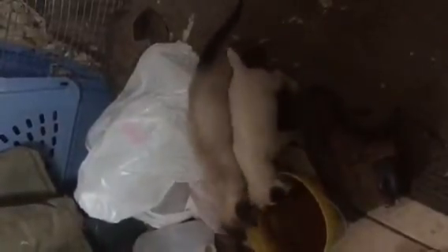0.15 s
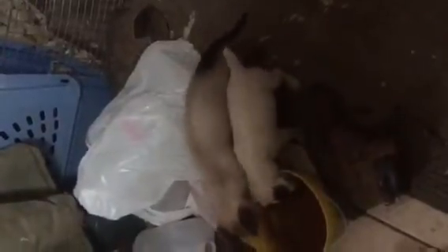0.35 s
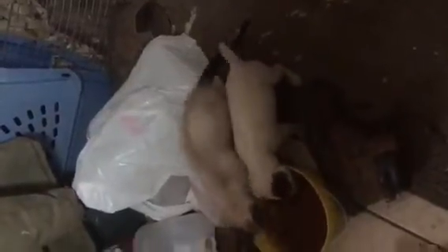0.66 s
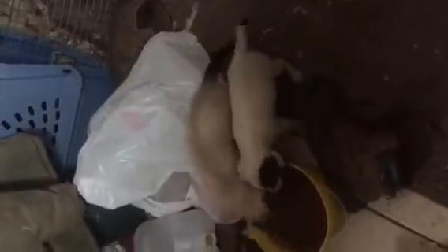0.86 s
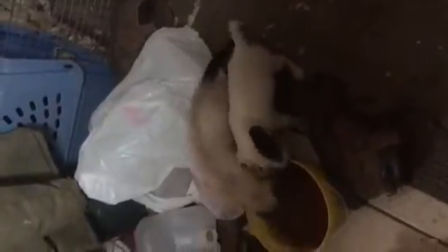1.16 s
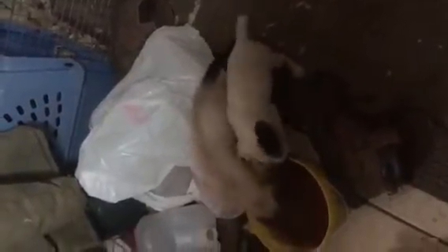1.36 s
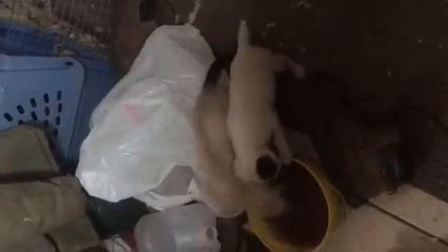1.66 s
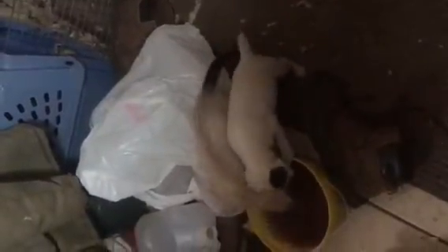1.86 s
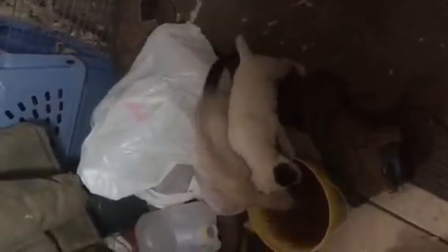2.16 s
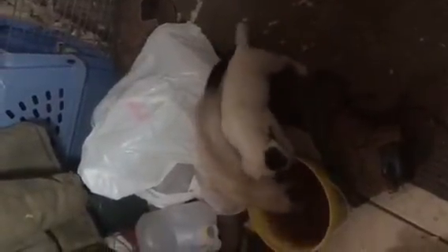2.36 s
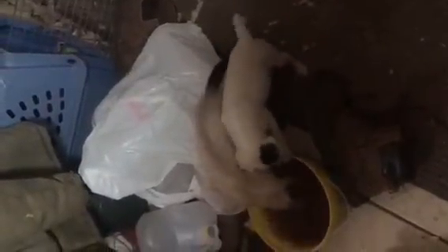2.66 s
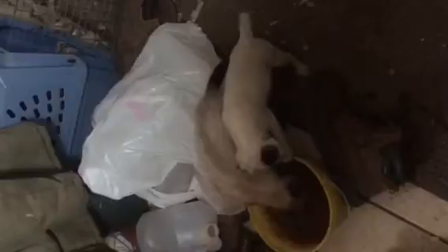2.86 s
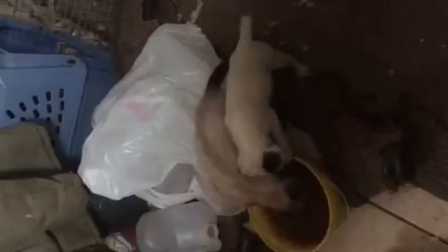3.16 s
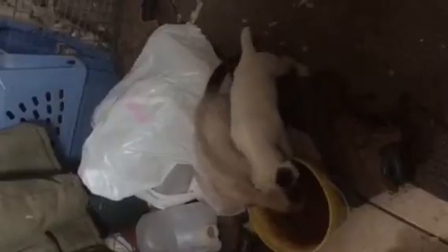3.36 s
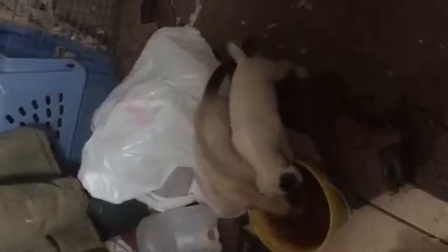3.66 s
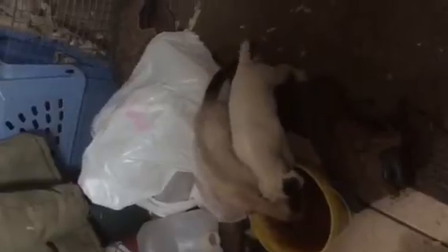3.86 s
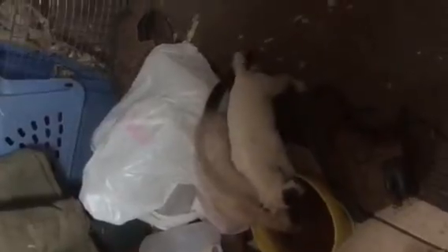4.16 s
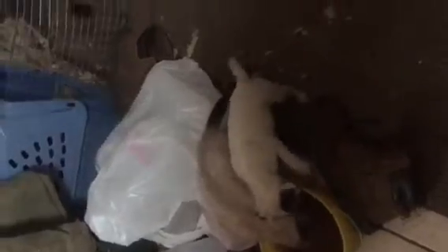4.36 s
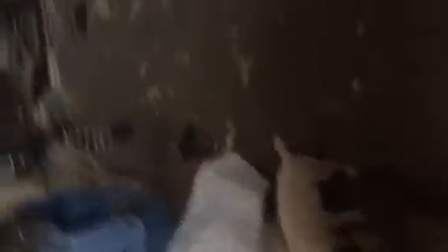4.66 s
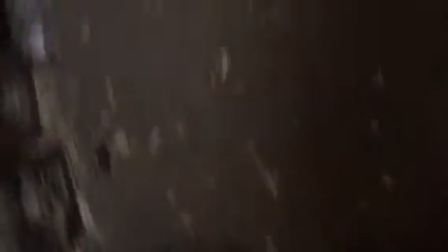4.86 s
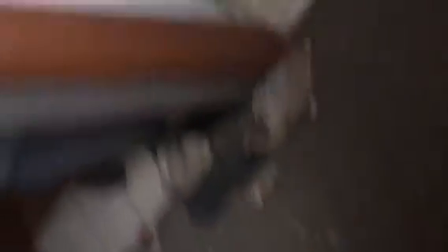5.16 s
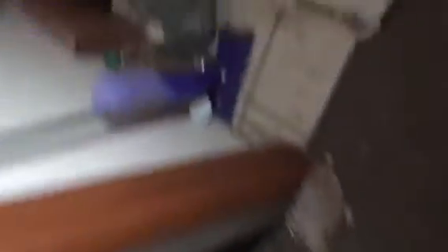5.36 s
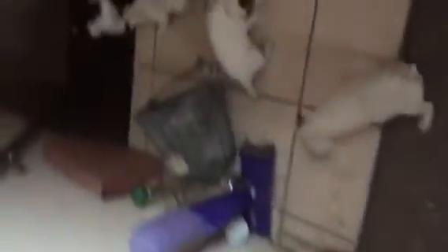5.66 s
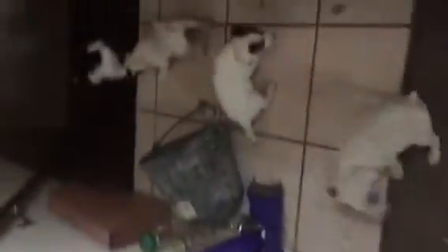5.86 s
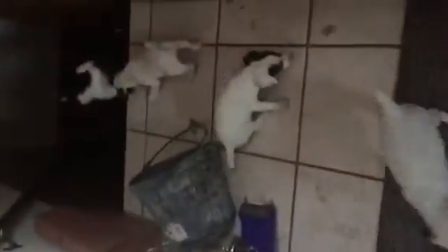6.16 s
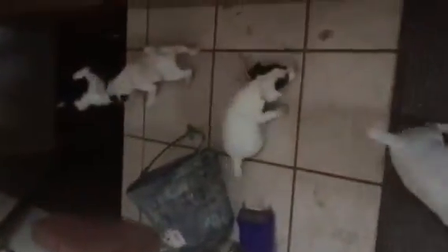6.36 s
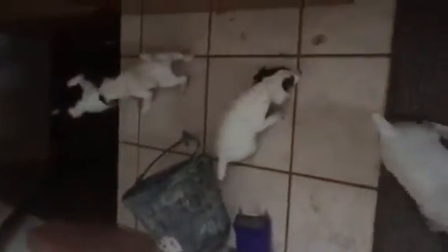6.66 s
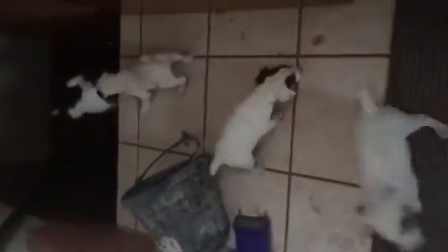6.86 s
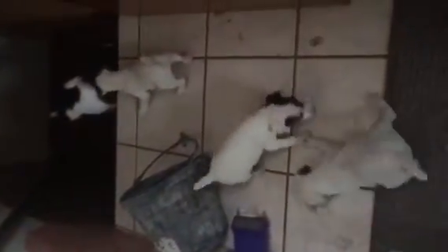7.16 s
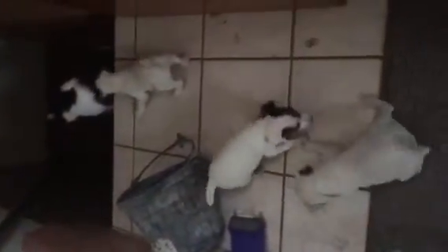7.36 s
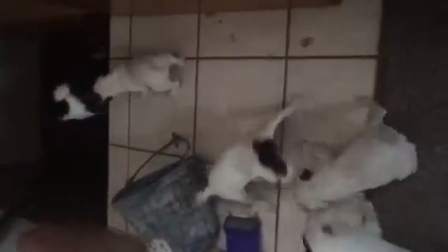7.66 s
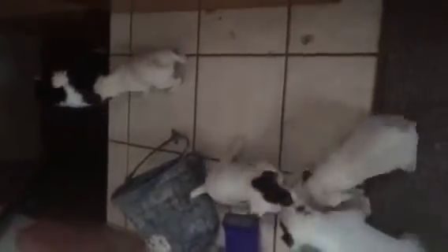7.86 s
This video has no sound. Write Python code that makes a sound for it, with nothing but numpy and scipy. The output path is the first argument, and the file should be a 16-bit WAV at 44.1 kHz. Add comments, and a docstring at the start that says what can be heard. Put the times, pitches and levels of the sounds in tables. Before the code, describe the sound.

In a small tiled room, puppies scuff and bump softly around a plastic food bowl, with light claw ticks and a few thin, faint whines from farther off. Near the end, one puppy close to the microphone gives three sharp, high, slightly raspy yips in quick succession. More faint whines and paw thuds follow, and a bigger dog just begins a growl. A low rumble and faint hiss lie underneath.

```python
"""A puppy yips three times close to the microphone, in a small tiled room: each yip starts as a clean
whistle of tight vocal folds, cracks into a rasp and slips into period doubling towards its crest.
Farther off, puppies crowd round a plastic food bowl and whine thinly, facing away; a bigger dog starts
a play growl at the very end. Paws scuff and thud, claws and the bowl tick, and a low rumble and faint
hiss lie underneath."""
import sys
import numpy as np
from scipy import signal
from scipy.fft import rfft, irfft, next_fast_len
from scipy.io import wavfile
from scipy.ndimage import uniform_filter1d, minimum_filter1d

SR = 44100
rng = np.random.default_rng(int(sys.argv[2]) if len(sys.argv) > 2 else 0)


def to_wav(s):
    """Save 16-bit WAV."""
    ch = np.atleast_2d(s).T  # columns
    pcm = np.round(np.clip(ch, -1, 1) * 32767)  # PCM
    wavfile.write(sys.argv[1], SR, pcm.astype(np.int16))


N = 352976

# All levels are relative. Room tone, spectra of its three bands: f/Hz, level/dB
RUMBLE_COLOUR = [(13, -39.5), (22, -17.5), (46, -2), (64, 1.5), (77, -1), (98, -7), (219, -17),
                 (256, -21.5), (354, -28.5), (476, -42.5), (900, -48), (1170, -52.5), (1980, -120)]
HISS_COLOUR = [(300, -2), (500, -7), (900, -8), (2100, -10), (5000, -14.5), (9000, -13), (12000, -22),
               (15700, -29)]
SIZZLE_COLOUR = [(7000, -28.5), (10000, -10.5), (12000, -3.5), (15500, -4.5)]
# room tone over time, in consecutive stretches: t/s, level/dB
RUMBLE_LEVEL = [
    [(0.0, -54), (0.38, -60), (1.74, -60), (2.25, -49), (2.72, -59), (3.63, -51), (4.01, -58), (5.2, -62),
     (5.95, -59)],
    [(7.2, -56), (7.284, -56), (7.532, -60), (7.712, -60), (7.856, -58), (8.0, -57)],
]
HISS_LEVEL = [
    [(0.0, -69), (1.24, -68), (1.93, -74), (3.85, -69)],
    [(4.8, -64), (4.944, -65), (5.712, -61), (5.9, -59)],
    [(7.12, -55), (7.32, -63), (7.878, -61), (8.0, -63)],
]
# reverberation of the tiled room: f/Hz, t60/s
ROOM_DECAY = [(200, 0.37), (1300, .6), (4000, 0.35), (8000, 0.66), (15000, 0.087)]
# soft footfalls and bumps: t/s, level/dB, body f/Hz, t60/s
THUDS = [(.53, -55.5, 235, 0.5), (.84, -64, 380, .2), (1.199, -62, 170, 0.24), (1.899, -60.5, 257, 0.56),
         (2.132, -42, 69.4, 0.42), (2.332, -48, 71, 0.35), (3.188, -49.5, 222, 0.6),
         (3.26, -45.5, 294, 0.32), (3.348, -43, 170, 0.17), (3.5, -48, 68, .35), (3.678, -44.5, 200, 0.19),
         (3.761, -44.5, 72, .2), (4.297, -51.5, 170, 0.29), (5.63, -49.5, 200, 0.25),
         (5.98, -39, 170, 0.41), (6.02, -44, 78, .9), (7.15, -36.5, 155, 0.37), (7.292, -44, 160, 0.3),
         (7.818, -43, 170, 0.22), (7.832, -38, 56, 0.3)]
# claw and bowl ticks: t/s, level/dB
TICKS = [(0.191, -54.5), (2.1494, -51.5), (2.6714, -45.5), (3.0754, -48.5), (3.252, -41), (3.653, -47),
         (3.7198, -47), (3.8397, -50.5), (3.8935, -36), (3.8957, -33), (3.908, -34.5), (4.2815, -36.5),
         (4.795, -40), (4.8776, -36), (4.9827, -49.5), (6.676, -39), (7.2866, -43), (7.441, -46)]
# paws and muzzles scuffing the bowl and floor: t/s, level/dB, t60/s
SCUFFS = [(0.301, -63.5, 0.12), (0.519, -62, 0.31), (1.362, -56, 0.03), (1.493, -58, 0.089),
          (2.459, -65, .3), (2.492, -55, 0.033), (2.599, -62, 0.12), (3.22, -59, 0.21), (3.25, -44, 0.23),
          (3.461, -60, 0.07), (3.653, -49, 0.034), (4.28, -44.5, 0.12), (4.298, -46, 0.26),
          (5.632, -56, 0.28), (5.674, -55, 0.063), (5.965, -56, 0.33), (7.111, -55.5, 0.267),
          (7.232, -59.5, 0.084), (7.286, -47.5, 0.049), (7.397, -59.5, 0.12), (7.44, -56.5, 0.045),
          (7.816, -53.5, 0.089)]
# spectra of those contacts: f/Hz, level/dB
TICK_COLOUR = [(470, -35.5), (800, -7.5), (3020, -1.5), (4890, -9.5), (5400, -2), (15500, -5)]
SCUFF_COLOUR = [(180, -28.5), (300, -6), (484, -13), (1620, -10), (1780, -8), (2560, -10.5), (4210, -19),
                (13400, -24), (14500, -25.5), (15500, -38.5)]
# ring of the plastic bowl: f/Hz, level/dB, t60/s
BOWL_MODES = [(980, -3, .12), (1600, -2.5, .1), (2028, -5.5, 0.092), (2600, -4.5, .13), (2780, -2.5, 0.13),
              (3000, -5.5, .15), (3850, -6, 0.16), (11400, -16, .22), (14180, -5.5, .19)]
# the bigger dog's growl: t/s, length/s, onset f/Hz, aim f/Hz, end f/Hz, level/dB, swell/dB
GROWL = (7.969, .09, 285, 300, 300, -30.5, 9)
# distant whines: columns as for the growl, then overtones/dB, nasal hiss/dB
WHINES = [ (1.121, .06, 1300, 1570, 1530, -41.5, 3, -3.5, -61),
          (1.718, .068, 1240, 1130, 925, -51, 9, -2, -78), (3.96, .042, 1450, 1380, 1325, -55, 3, -10, -72),
          (4.012, .265, 1490, 1995, 1810, -44.2, 12, -4, -63),
          (4.579, .11, 1810, 1750, 1450, -45.5, 0, -.5, -61),
          (5.138, .072, 1180, 1290, 1195, -55, 4, -8, -62), (5.39, .04, 1330, 1260, 1180, -47.5, 6, 0, -70),
          (5.671, .038, 965, 860, 825, -52, 8, -10, -76),
          (5.778, .066, 1710, 1690, 1460, -46, 2, -1.5, -66), (7.018, .03, 720, 700, 690, -52, 4, -14, -75),
          (7.558, .06, 950, 990, 1200, -50, 9, -3, -60), (7.691, .055, 1380, 1350, 1100, -47, 8, 2, -58)]
# close squeaks ahead of the first two yips: columns as for the growl
SQUEAKS = [(6.002, .055, 2770, 2800, 3350, -49, 8), (6.268, .072, 3850, 3780, 3330, -46, 4)]
# close yips, five groups a row:
#   timing: start t/s, crack t/s, crest t/s, end t/s, attack/s
#   pitch: f/Hz at lead-in, crack, crest, end
#   fundamental, then overtones: level/dB at lead-in, crack, crest
#   manner: rasp length/s, period doubling/0-1, final fade/dB
YIPS = [ ((6.038, 6.07, 6.149, 6.172, .003), (1200, 1530, 1325, 1305), (-21, -12, -4), (-23.5, -10, -7.5),
        (.07, .35, 22)), ((6.358, 6.404, 6.468, 6.512, .024), (1190, 1260, 1355, 1150), (-17, -13, -1.5),
        (-28, -14, -11), (.036, .65, 3)), ((6.804, 6.833, 6.895, 6.925, .008), (1075, 1270, 1425, 1360),
        (-22.5, -17.5, -21), (-23.5, -14, -18.5), (.06, .75, 12))]
# throat and mouth responses, with a different one for each yip: f/Hz, level/dB
GROWL_THROAT = [(280, -10.5), (580, -17), (900, -24.5), (1300, -29), (2500, -47), (8000, -28)]
WHINE_THROAT = [(800, -4), (1900, -2), (2300, -20), (3300, -26), (3750, -16), (4900, -14), (6300, -17),
                (9000, -14), (11000, -19), (15000, -13)]
YIP_THROATS = [
    [(300, -44.5), (850, -28), (1200, -7), (1550, 1.5), (2050, -8.5), (2700, -3), (3300, -5.5), (4250, -8),
     (4800, -17.5), (6300, -19), (7600, -37.5), (9000, -34), (12500, -45.5), (15000, -31.5)],
    [(300, -39), (850, -27.5), (1200, -3.5), (1450, 0), (1650, -12), (2050, 1), (2500, -9.5), (3400, -7.5),
     (3950, -4.5), (4400, -20.5), (6100, -17.5), (7600, -36), (13000, -43.5), (15000, -24)],
    [(300, -45.5), (850, -25.5), (1100, -3.5), (1550, 2.5), (2100, -9.5), (2700, -8.5), (3500, 3),
     (4300, -12.5), (5400, -16.5), (6800, -19), (7600, -29.5), (9200, -27.5), (11000, -34), (15000, -37)],
]


def amp(db):
    """Decibels to gain."""
    return 10 ** (np.asarray(db) / 20)


def unit(x):
    """Scale to rms 1."""
    return x / np.sqrt(np.mean(x ** 2) + 1e-20)


def along(points, hz):
    """Read (f/Hz, value) points on a log frequency axis."""
    f, values = np.transpose(points)
    return np.interp(np.log(hz + 1), np.log(f + 1), values)


def curve(stretches):
    """Join stretches of (t/s, value) rows, one value a sample."""
    return np.interp(np.arange(N) / SR, *np.vstack(stretches).T)


def wobble(rate, size):
    """A smooth random curve with rate knots a second."""
    place = np.arange(size) * rate / SR
    knots = rng.standard_normal(int(place[-1]) + 2)
    k = place.astype(int)
    u = place - k
    return knots[k] + np.diff(knots)[k] * u * u * (3 - 2 * u)


def filtered(x, response):
    """x through a gain that depends on frequency."""
    m = next_fast_len(len(x) + SR // 4)
    return irfft(rfft(x, m) * response(np.fft.rfftfreq(m, 1 / SR)), m)[:len(x)]


def coloured(x, colour):
    """x through a (f/Hz, level/dB) spectrum."""
    return filtered(x, lambda hz: amp(along(colour, hz)))


def noise(colour, size):
    """Noise of rms 1 with the given spectrum."""
    return unit(coloured(rng.standard_normal(size), colour))


def add(track, start, sound):
    """Mix a sound into the track at start seconds."""
    part = track[max(round(start * SR), 0):][:len(sound)]
    part += sound[:len(part)]


def partial(hz, k=1):
    """A sine of rms 1 at k times a moving pitch, muted above half the sample rate."""
    phase = 2 * np.pi * np.cumsum(hz) / SR
    return (k * hz < SR / 2) * np.sin(k * phase + rng.uniform(0, 2 * np.pi)) * np.sqrt(2)


def gate(t, edge_s):
    """A voice switches on quickly and off a little more slowly."""
    return np.clip(2 * t / edge_s, 0, 1) * np.clip((t[-1] - t) / (2 * edge_s), 0, 1)


def room_tone():
    """Uneven low rumble, a faint hiss and a crackly high sizzle that swells with the hiss."""
    hiss_db = curve(HISS_LEVEL)
    rustle_db = 1.1 * wobble(14, N) + 1.2 * wobble(90, N)
    rumble = noise(RUMBLE_COLOUR, N) * amp(curve(RUMBLE_LEVEL) + 2.1 + 2.3 * wobble(11, N))
    hiss = noise(HISS_COLOUR, N) * amp(hiss_db - 1.5 + rustle_db)
    sizzle = noise(SIZZLE_COLOUR, N) * amp(hiss_db - 1 + 1.6 * rustle_db)
    return rumble + hiss + sizzle


def tiled_walls(x, early_db, tail_db, early_t60=0.24):
    """Dense reflections off the near walls, then a weaker tail whose highest treble dies first."""
    hz, t, spectra = signal.stft(rng.standard_normal((2, SR)), SR, nperseg=256)
    tail_t60 = along(ROOM_DECAY, hz)[:, None]
    early = signal.istft(spectra[0] * amp(-60 * t / early_t60), SR, nperseg=256)[1]
    tail = signal.istft(spectra[1] * amp(-60 * t / tail_t60), SR, nperseg=256)[1]
    response = amp(early_db) * early / np.linalg.norm(early) + amp(tail_db) * tail / np.linalg.norm(tail)
    return signal.fftconvolve(x, np.pad(response, (SR // 250, 0)))[:N]  # 4 ms behind the direct sound


def thuds(damping=0.19, top_hz=450, attack_s=0.0021):
    """Soft weight landing on the floor: a low, damped resonance."""
    out, t = np.zeros(N), np.arange(SR // 2) / SR
    for start, db, body_hz, t60 in THUDS:
        resonance = lambda f: f / np.hypot(body_hz ** 2 - f * f, damping * body_hz * f)
        body = filtered(rng.standard_normal(len(t)),
                        lambda f: resonance(f) / np.hypot(1, (f / top_hz) ** 2))
        add(out, start, unit(body) * amp(db - 60 * t / t60) * (1 - np.exp(-t / attack_s)))
    return out


def ticks(t60=0.0085, faint_count=110):
    """Hard little contacts of claws and bowl: a few clear ones among many faint ones."""
    envelope, t = np.zeros(N), np.arange(SR // 40) / SR
    faint = rng.uniform([0, -66], [N / SR, -56], (faint_count, 2))  # t/s, level/dB
    for start, db in [*TICKS, *faint]:
        add(envelope, start, amp(db - 3.5 - 60 * t / t60))
    return envelope * noise(TICK_COLOUR, N)


def scuffs(grain_db=4, ring_db=-10, attack_s=0.0025):
    """Short gritty scrapes that set the bowl ringing."""
    envelope, t = np.zeros(N), np.arange(SR // 3) / SR
    for start, db, t60 in SCUFFS:
        add(envelope, start, amp(db - 0.6 - 60 * t / t60) * (1 - np.exp(-t / attack_s)))
    grit = envelope * unit(noise(SCUFF_COLOUR, N) * amp(grain_db * wobble(400, N)))
    bowl = sum(amp(db - 60 * t / t60) * np.sin(2 * np.pi * hz * t) for hz, db, t60 in BOWL_MODES)
    ring = unit(signal.fftconvolve(grit, bowl)[:N])
    return grit + amp(ring_db) * np.std(grit) * ring


def glide(length, onset_hz, aim_hz, end_hz, db, swell_db, scoop_share=.2, rise_share=.28, fall_share=.4):
    """Pitch and envelope of a soft call: it scoops to its note, then slides away as it fades."""
    t = np.arange(0, length, 1 / SR)
    progress = t / length
    hz = aim_hz + (end_hz - aim_hz) * progress + (onset_hz - aim_hz) * np.exp(-progress / scoop_share)
    rise_db = -swell_db * np.maximum(1 - progress / rise_share, 0)
    fall_db = -15 * np.maximum(1 - (1 - progress) / fall_share, 0)
    return hz, amp(db + rise_db + fall_db) * gate(t, edge_s=.003)


def soft_call(call, throat, overtone_db, jitter, shimmer, air):
    """A quiet, airy call through a nearly closed mouth."""
    hz, envelope = glide(*call[1:])
    n = len(hz)
    hz = hz * (1 + jitter * (wobble(300, n) + .6 * wobble(70, n)))  # fast shake, slower wander
    overtones = sum(partial(hz, k) * amp(3 * wobble(50, n)) for k in range(2, 11))
    folds = partial(hz) + amp(overtone_db) * (overtones + air * rng.standard_normal(n))
    out = np.zeros(N)
    add(out, call[0], coloured(envelope * folds * (1 + shimmer * wobble(200, n)), throat))
    return out


def growl():
    """A bigger dog's play growl, away from the microphone: low, unsteady and full of breath."""
    return soft_call(GROWL, GROWL_THROAT, overtone_db=0.5, jitter=0.082, shimmer=.4, air=2.61)


def whines(puff_spread_s=.05):
    """Thin nasal whistles across the room, each outlasted by a hiss of air through the nose."""
    t = np.arange(N) / SR
    voices, puffs = np.zeros(N), np.zeros(N)
    for *call, overtone_db, nose_db in WHINES:
        start, length = call[:2]
        jitter = .012 * np.sqrt(.07 / length)  # longer whines are steadier
        voices += soft_call(call, WHINE_THROAT, overtone_db, jitter, shimmer=0.18, air=0.4)
        puffs += amp(nose_db) * np.exp(-((t - start - length / 2) / (length / 2 + puff_spread_s)) ** 2)
    return voices + puffs * noise(SIZZLE_COLOUR, N)


def squeaks(jitter=0.025):
    """Very high, pure squeaks close by: air whistling through the tightest gap."""
    out = np.zeros(N)
    for start, *shape in SQUEAKS:
        hz, envelope = glide(*shape)
        add(out, start, envelope * partial(hz * (1 + jitter * wobble(790, len(hz)))))
    return out


def yip_controls(timing, pitch, fundamental_db, overtone_db, manner, overshoot=.1, settle_s=.008):
    """A rising whistle cracks, bends to its crest while the rasp clears, then droops and fades."""
    start, crack, crest, end, attack = timing
    lead_hz, crack_hz, crest_hz, end_hz = pitch
    rasp_s, doubling, fade_db = manner
    t = np.arange(start, end, 1 / SR)
    break_s = .0015 + .26 * attack  # the voice breaks more slowly after a slow attack
    broken = (1 + np.tanh((t - crack) / break_s)) / 2
    since_crack = np.maximum(t - crack, 0)
    climb = np.clip(since_crack / (crest - crack), 0, 1)
    droop = np.clip((t - crest) / (end - crest), 0, 1)
    whistle_hz = lead_hz * (1 + 2 * (t - start))
    cry_hz = crest_hz + (crack_hz - crest_hz) * (1 - climb) ** 2 + (end_hz - crest_hz) * droop ** 2
    leap = 1 + overshoot * np.exp(-since_crack / settle_s)  # too high at the crack, then falling back
    hz = (1 - broken) * whistle_hz + broken * cry_hz * leap
    envelope = np.minimum((t - start) / attack, 1) * amp(-fade_db * droop) * gate(t - start, .0025)
    rough = (1 - broken) * .08 + broken * (.13 + np.exp(-(since_crack / rasp_s) ** 2))

    def gain(lead_db, crack_db, crest_db):
        cry_db = crack_db + (crest_db - crack_db) * climb
        return envelope * amp((1 - broken) * lead_db + broken * cry_db)

    return hz, gain(*fundamental_db), gain(*overtone_db), doubling * climb, rough


def fluttering_partials(hz, multiples, flutter_db=4.6, tilt_db=-.55):
    """The pulse of the folds keeps changing shape, so each partial flutters on its own."""
    return sum(partial(hz, k) * amp(flutter_db * (wobble(93, len(hz)) - 0.72) + tilt_db * (k - 5))
               for k in multiples)


def yips(jitter=.04, lurch=0.038, shimmer=0.11, rasp_db=6, doubling_db=-2):
    """Close to the microphone, tight vocal folds are driven until they beat in pairs or irregularly."""
    out = np.zeros(N)
    for row, throat in zip(YIPS, YIP_THROATS):
        hz, fundamental_gain, upper_gain, doubling, rough = yip_controls(*row)
        start, n = row[0][0], len(hz)
        # when rough, the pitch lurches about and single cycles scatter
        hz *= 1 + 0.0026 * wobble(150, n) + rough * (lurch * wobble(170, n) + jitter * wobble(900, n))
        overtones = fluttering_partials(hz, np.arange(2, 14))
        # alternate strong and weak cycles put lines halfway between the harmonics
        halfway = fluttering_partials(hz, np.arange(14) + .5)
        rasp = rng.standard_normal(n) * (1 + partial(hz) / 2)  # turbulent air escapes once a cycle
        upper = overtones + amp(doubling_db) * doubling * halfway + amp(rasp_db) * rough * rasp
        folds = fundamental_gain * partial(hz) + upper_gain * upper
        folds *= 1 + shimmer * rough * wobble(600, n)
        add(out, start, coloured(folds, throat))
    return out


def scene(shadow_hz=5000):
    """All the dogs from one spot in the room: the farther the source, the more of the walls is heard."""
    near = yips() + squeaks()
    far = whines() + growl()
    contacts = scuffs() + ticks()
    # the far dogs face away, so their high overtones arrive mostly off the walls
    direct = near + contacts + filtered(far, lambda hz: 1 / np.hypot(1, hz / shadow_hz))
    reflected = tiled_walls(near, early_db=-6.5, tail_db=-17.5)
    reflected += tiled_walls(far + contacts, early_db=-5, tail_db=-13)
    return (direct + reflected + thuds() + room_tone())[None]


def record(dry, low_cut_hz=42, top_hz=15830, ceiling=.72, recovery_db_per_s=15):
    """One microphone, deep bass and extreme treble cut; its gain ducks on loud yips and creeps back."""
    x = filtered(dry[0], lambda hz: 1 / np.hypot(1, (low_cut_hz / (hz + 1)) ** 4))
    needed_db = 20 * np.log10(np.minimum(1, ceiling / (np.abs(x) + 1e-9)))
    creep_db = recovery_db_per_s * np.arange(N) / SR
    gain_db = np.minimum.accumulate(minimum_filter1d(needed_db, size=60) - creep_db) + creep_db
    limited = x * amp(uniform_filter1d(gain_db, size=60))
    return filtered(limited, lambda hz: hz < top_hz)[None]


dry = scene()
out = record(dry)
to_wav(out)
```